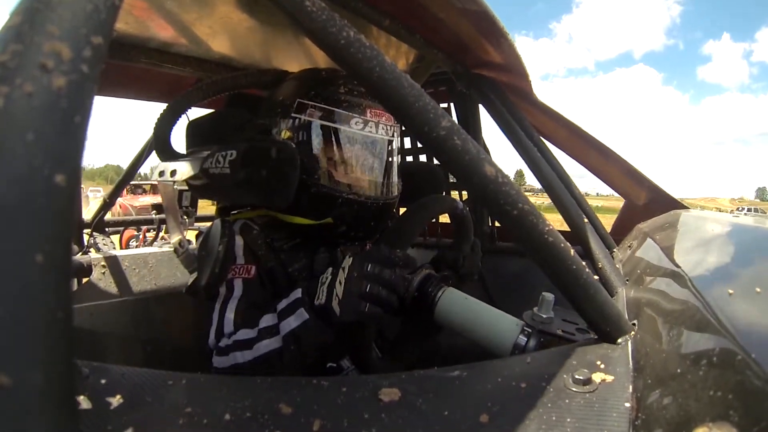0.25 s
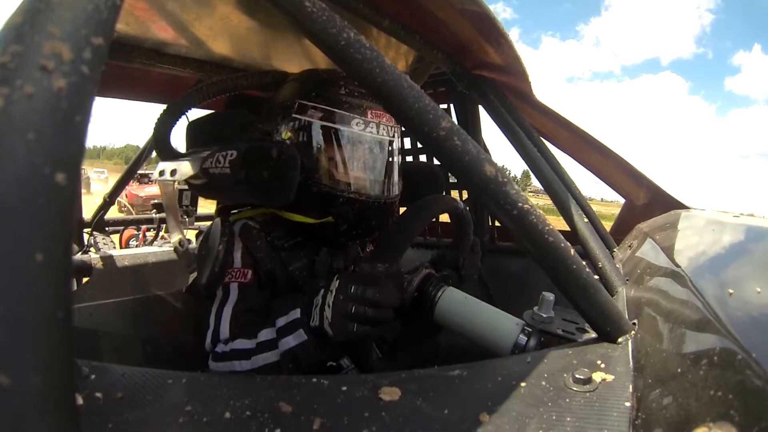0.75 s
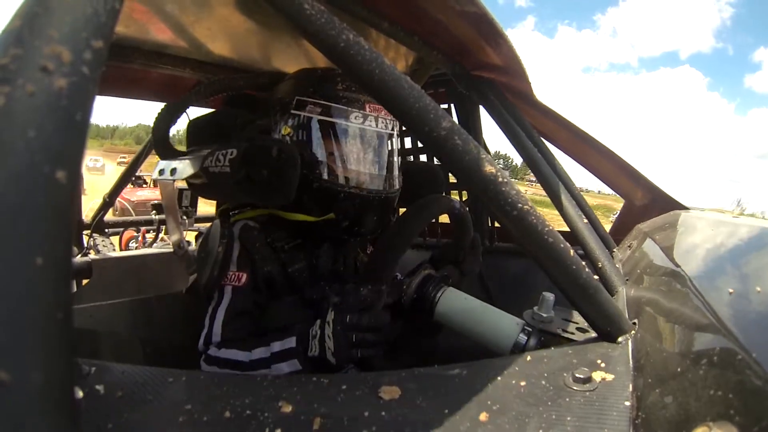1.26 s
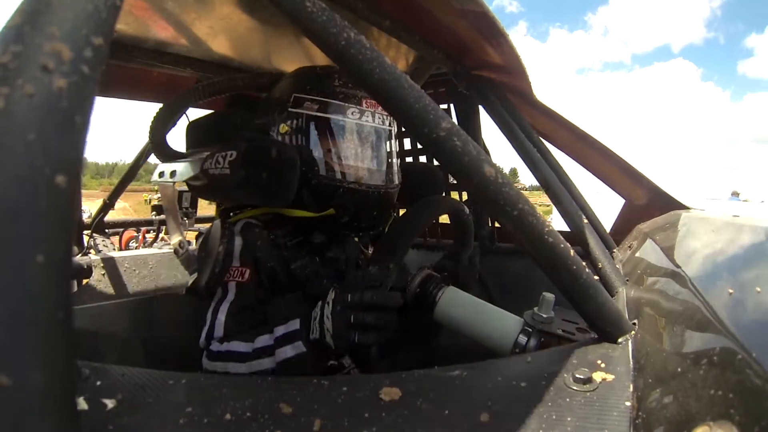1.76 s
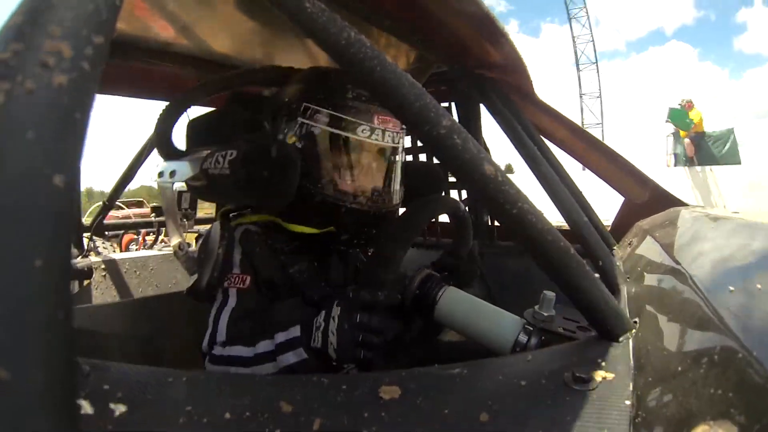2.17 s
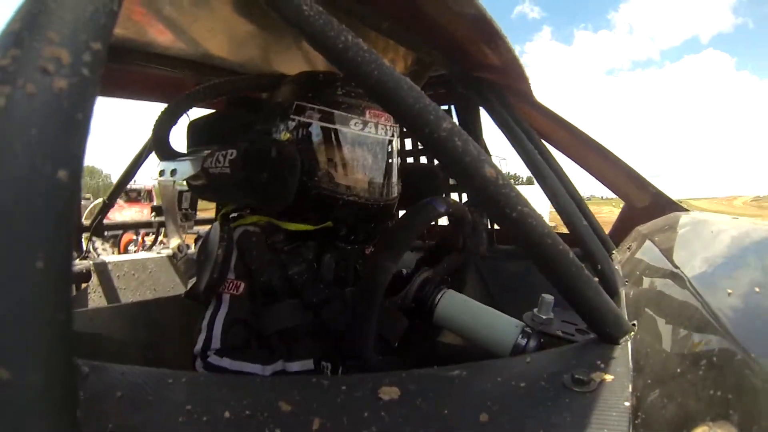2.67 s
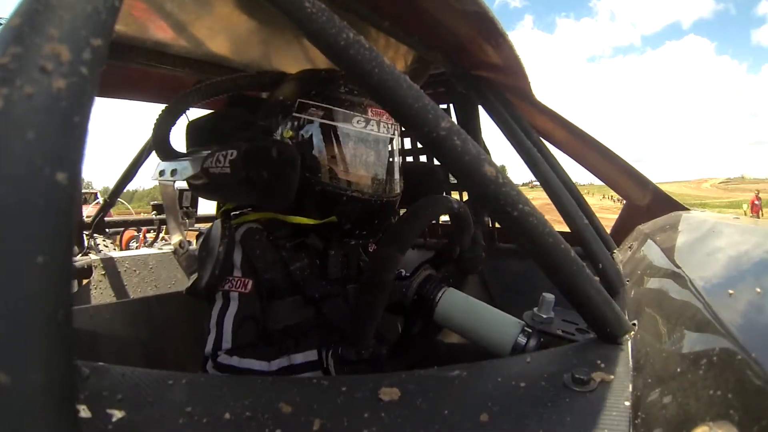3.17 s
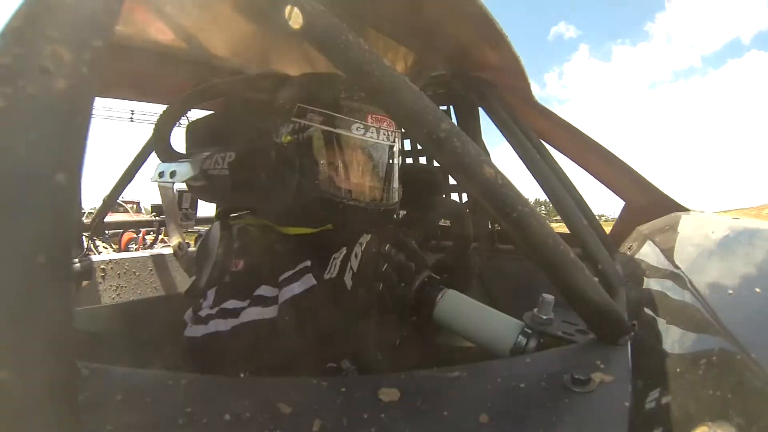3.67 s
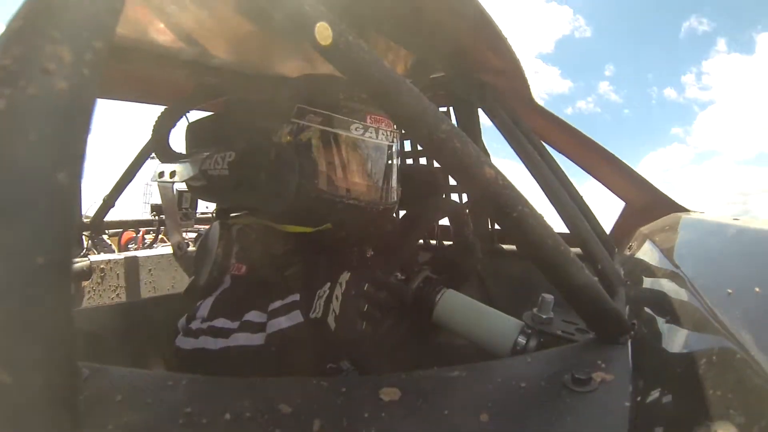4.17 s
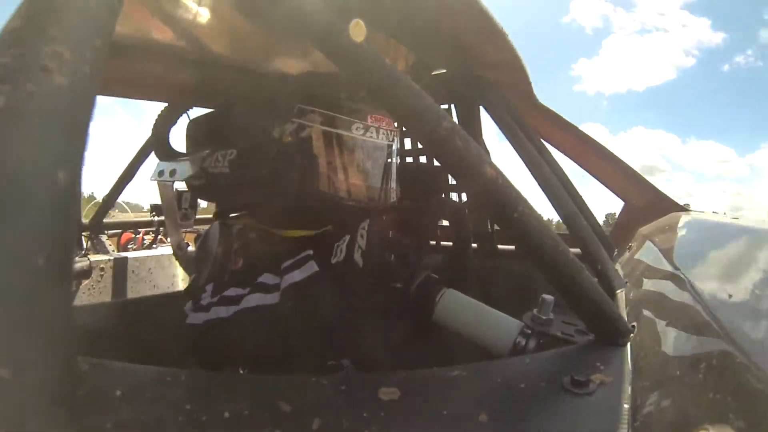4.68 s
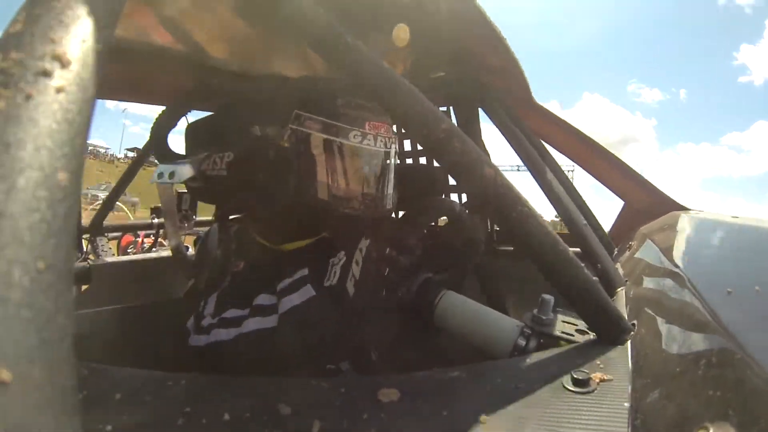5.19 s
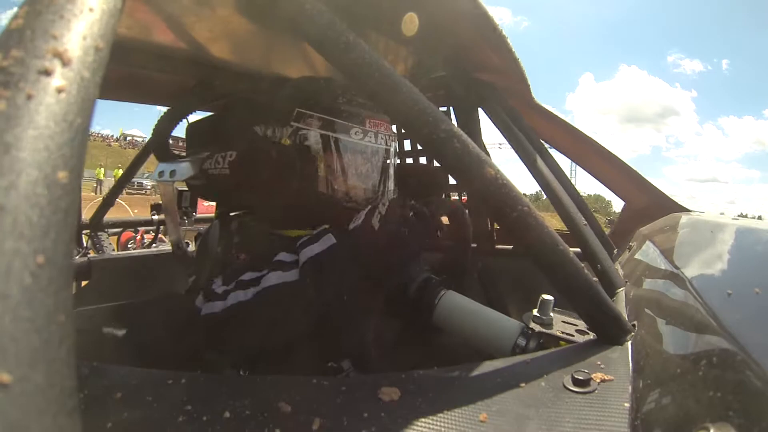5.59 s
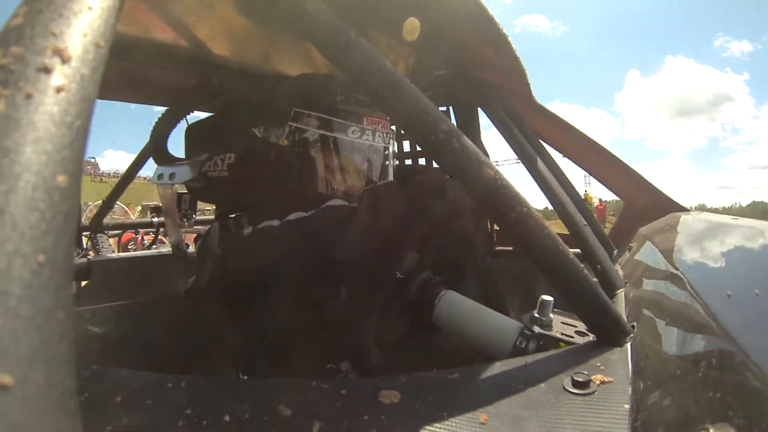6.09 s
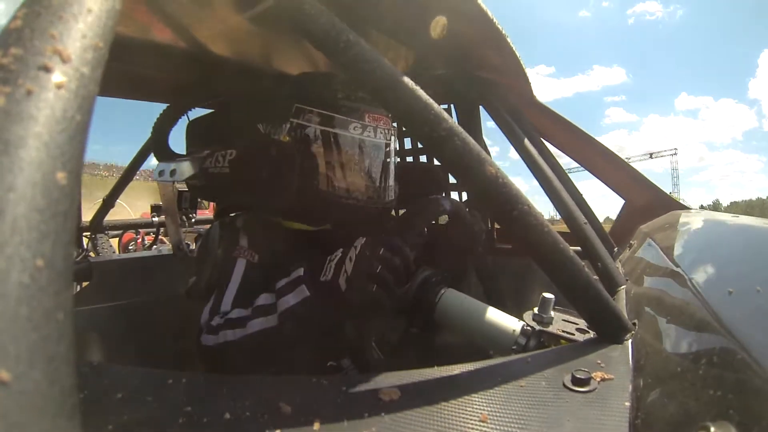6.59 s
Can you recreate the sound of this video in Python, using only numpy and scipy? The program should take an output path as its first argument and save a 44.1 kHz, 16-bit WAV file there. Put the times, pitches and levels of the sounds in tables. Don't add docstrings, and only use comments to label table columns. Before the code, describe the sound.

Inside an open dirt-racing cockpit, a microphone sealed in a shaking housing picks up a strong low engine hum with dry rattling and faint exhaust hiss. The pitch wavers near two seconds, drops and recovers, then sags lower around three and a half seconds under rough bumps and grit pings. It climbs back and holds steadier, with less rattle, to the end.

```python
import sys
import numpy as np
from scipy import signal
from scipy.fft import rfft, irfft, next_fast_len
from scipy.io import wavfile
from scipy.ndimage import map_coordinates

SR = 44100
rng = np.random.default_rng(int(sys.argv[2]) if len(sys.argv) > 2 else 0)


def store_pcm(level_fs):
    pcm = np.round(np.clip(level_fs, -1, 1) * 32767).astype(np.int16)
    wavfile.write(sys.argv[1], SR, np.atleast_2d(pcm).T)


def how_loud(loudness_db):
    steps = np.asarray(loudness_db, float) / 20
    return 10 ** steps


N = 301644
USUAL_ROAD_DB, USUAL_PEDAL_DB = -27, -60

# (time [s], housing rattle [dB])
ROAD = [(0, -26), (.95, -26.5), (1.62, -27.5), (1.76, -23), (1.96, -22.5), (2.0, -26.5), (2.11, -34),
        (2.34, -21), (2.65, -35.5), (3.05, -33), (3.22, -21), (3.73, -16), (3.92, -18), (4.44, -37),
        (4.95, -32), (5.6, -39.5), (6.1, -29.5), (6.84, -32)]
# (time [s], rise [dB], half length [s])
PATCHES = [(.02, 1.5, 0.11), (.91, 2, 0.053), (1.08, 0, 0.06), (1.96, 1.5, 0.022), (2.42, 2.5, 0.067),
           (2.8, 2, 0.2), (3.33, 1, 0.049), (3.47, 0, 0.19), (4.72, 3, .08), (4.8, -2.5, .05),
           (5.0, 4.5, .08), (5.14, 2.5, .07), (5.52, 6.5, 0.2), (6.27, -4, 0.19), (6.52, 0.5, 0.17),
           (6.73, -1, 0.064)]
# (time [s], depth [dB], half length [s])
JOLTS = [(.17, 1, 0.069), (1.05, 1.5, .05), (1.88, 2, 0.11), (2.19, 10, 0.028), (2.25, 13, 0.025),
         (2.3, 9, 0.025), (3.11, 8, .08), (3.62, 2.5, 0.062), (3.82, 2, 0.014), (3.92, 17, 0.022),
         (4.0, 0, 0.027), (4.08, 15, 0.013), (4.68, 3, 0.088), (5.06, 3.5, 0.079), (5.49, 10.5, 0.057),
         (5.98, 1.5, 0.11)]
# (time [s], level [dB])
BUMPS = [(0, -33), (.13, -30), (.3, -29), (.6, -29), (.82, -30), (1.03, -28), (1.25, -32), (1.43, -30),
         (1.66, -30), (2.23, -34), (2.38, -24), (2.93, -35), (3.37, -18.5), (3.54, -17.5), (3.79, -16.5),
         (3.94, -15), (4.2, -24), (4.65, -27), (4.99, -21), (5.24, -28), (5.52, -27), (5.98, -25),
         (6.13, -25), (6.5, -32), (6.8, -32)]
# (time [s], crank turns a second [Hz])
SPEED = [(0, 109.5), (.25, 108), (.9, 108.5), (1.6, 106.5), (2.0, 105), (2.17, 96.72), (2.25, 85.6),
         (2.36, 93.9), (2.68, 102.6), (2.92, 104.9), (3.33, 81.75), (3.69, 74.95), (3.97, 74.4),
         (4.05, 87.4), (4.3, 99.3), (4.71, 104.4), (5.7, 102.3), (6.84, 107.1)]
# (time [s], rise [Hz], half length [s])
SURGES = [
    (1.85, 7.59, 0.1799),
    (5.08, 5.52, .17),
    (5.51, 7.15, .08),
    (6.1, 4.27, .3),
]
# (time [s], held [s], exhaust hiss [dB], sag [dB a second])
PEDAL = [
    (-.1, 1.71, -58.5, -0.6),
    (1.56, .39, -59.5, -11.5),
    (2.31, .5, -56.5, 21.5),
    (2.71, .23, -60, 7),
    (3.12, .96, -66, 0),
    (4.03, .7, -57.5, 14),
    (4.65, 0.66, -63.5, -3.5),
    (5.09, .45, -61.5, 18),
    (5.48, 0.7, -60.5, 15.5),
    (5.91, 1.11, -62, -2.5),
]
# (time [s], crack peak [dB], ring peak [dB], ring pitch [Hz])
GRIT = [(1.3254, -49.5, -41.5, 4140), (1.8592, -39.5, -39, 4174), (1.934, -42, -43, 4696),
        (2.9212, -45, -50, 4285), (3.107, -46, -43, 4550), (3.115, -56, -46.5, 4700),
        (3.2196, -36.5, -38, 4573), (3.6677, -53, -17.5, 4540), (3.718, -46.5, -28, 4680),
        (4.4764, -48.5, -25.5, 4530), (5.5953, -53, -37.5, 3700)]
# (time [s], length [s], first pitch [Hz], last pitch [Hz], level [dB])
WHINE = [(0, 1.1, 1430, 1432, -38), (-.05, .55, 2835, 2862, -39), (.52, .55, 2848, 2862, -39),
         (-.05, .8, 3066, 3050, -44), (1.28, .5, 3222, 3070, -43), (.25, .9, 1036, 1024, -35),
         (1.0, .2, 930, 914, -27), (1.2, .42, 926, 906, -28), (1.15, .55, 1004, 952, -31),
         (2.2, .18, 938, 952, -25), (2.35, .4, 908, 948, -30.5), (2.66, .39, 954, 912, -30),
         (6.08, .26, 915, 886, -31), (6.28, .38, 892, 908, -29), (6.6, .26, 895, 878, -37)]
# (pitch [Hz], width [Hz], level [dB])
FRAME = [(98.2, 25, 8), (227.4, 23, 1.5), (267, 30, -1.5), (375.3, 57, -8.5), (464.8, 49, -4),
         (639, 25, -16.5)]
# (pitch [Hz], width [Hz], level [dB])
TUBES = [(224.5, 22.3, -0.5), (270.2, 25.5, -3)]
# (pitch [Hz], width [Hz], level [dB])
SHELL_LOW = [(700.7, 12, -4), (832, 73, 1), (908, 79, 5), (1117, 80, 8), (1263, 180, -4.5), (1395, 75, 4.5),
             (1560, 185, -1), (1724, 61, 3.5), (2062, 140, 0), (2420, 200, -11.5)]
# (pitch [Hz], width [Hz], level [dB])
SHELL_HIGH = [(2632, 300, -12), (2900, 120, -0.5), (3129, 148, -3.5), (4260, 516, -17), (4680, 170, -13),
              (5287, 220, -16.5)]
# (pitch [Hz], width [Hz], level [dB])
LATCH = [(1119, 37, 0.5), (4650, 150, -24)]
# (pitch [Hz], width [Hz], level [dB])
VALVE_COVER = [(7440, 160, 0)]
# (frequency [Hz], level per Hz [dB])
RUMBLE = [(15, 2), (30, -14.5), (70, -3), (150, -23.5), (400, -31), (800, -15.5), (2000, -19), (4000, -47),
          (9000, -110)]
# (frequency [Hz], level per Hz [dB])
AIR_RUSH = [(3000, -30), (5000, -2), (7000, 0.5), (9000, -15), (12000, -14), (14300, -27), (15500, -29)]
# (frequency [Hz], level per Hz [dB])
EXHAUST = [(2500, -40.5), (4500, -4.5), (6000, -1), (7500, -2.5), (8800, -3), (11000, -9.5), (13000, -11),
           (14300, -21), (15500, -26.5)]
# (multiple of crank speed [1], level against the second multiple [dB])
ORDERS = [(.5, -8.5), (2.5, -11), (3, -5), (1.5, -7.5), (3.5, -10)]


def ticks():
    return np.arange(0, N + 64, 64) / SR


def smooth(control):
    return np.interp(np.arange(N) / SR, ticks(), control)


def curve(rows):
    s, value = np.transpose(rows)
    return np.interp(np.arange(N) / SR, s, value)


def humps(rows):
    total = 0
    for s, height, half in rows:
        position = np.clip((ticks() - s) / half, -1, 1)
        total = total + height * np.cos(np.pi / 2 * position) ** 2
    return smooth(total)


def wobble(rate):
    knots = rng.standard_normal(int(N * rate / SR) + 4)
    return smooth(map_coordinates(knots, [ticks() * rate]))


def unit(x):
    return x / np.sqrt(np.mean(x ** 2) + 1e-20)


def noise():
    return rng.standard_normal(N)


def filtered(x, response):
    m = next_fast_len(N + SR // 2)
    spectrum = rfft(x, m) * response(np.fft.rfftfreq(m, 1 / SR))
    return unit(irfft(spectrum, m)[:N])


def colour(points):
    f, db = np.transpose(points)
    return lambda hz: how_loud(np.interp(np.log(hz + 1), np.log(f + 1), db))


def modes(table, steep=1):
    def response(f):
        total = 0
        for k, (centre, width, db) in enumerate(table):
            damping = 1j * f * width
            ring = damping / (centre * centre - f * f + damping)
            total = total + (-1) ** k * how_loud(db / steep) * ring
        return total ** steep
    return response


def walls(edge_hz, order):
    return lambda f: 1 / (1 + 1j * f / edge_hz) ** order


def knocks(per_second, spread_db):
    hit = rng.random(N) < per_second / SR
    strength = how_loud(spread_db * rng.exponential(size=N))
    return unit(hit * strength * noise())


def road():
    return curve(ROAD) + humps(PATCHES) + 0.14 * humps(JOLTS) - USUAL_ROAD_DB


def pedal():
    t = ticks()
    shut_db, move_s = -69, 0.068
    presses = []
    for s, held, db, sag in PEDAL:
        opening = np.clip(np.minimum(t - s, s + held - t) / move_s + 0.5, 0, 1)
        presses.append(opening * (db - sag * (t - s) - shut_db))
    return smooth(shut_db + np.max(presses, axis=0) - USUAL_PEDAL_DB)


def speed():
    return curve(SPEED) + humps(SURGES)


def crank_turns():
    shiver = 1 + 0.0036 * wobble(19) + 0.00495 * wobble(5)
    return np.cumsum(speed() * shiver) / SR


def grit():
    out, t = np.zeros(N + SR), np.arange(600) / SR
    for s, crack_db, ring_db, hz in GRIT:
        rough = np.convolve(rng.standard_normal(len(t)), [1, 1, -1, -1], 'same')
        crack = rough * how_loud(crack_db - 8 - 60 * t / 0.006)
        ring = how_loud(ring_db - 5 - 60 * t / 0.011) * np.sin(2 * np.pi * hz * t)
        out[round(s * SR):][:len(t)] += crack + ring
    return out[:N]


def whine():
    t, out = ticks(), np.zeros(N)
    for s, length, first_hz, last_hz, db in WHINE:
        hz = smooth(first_hz + (last_hz - first_hz) * np.clip((t - s) / length, 0, 1))
        fade = smooth(np.clip(np.minimum(t - s, s + length - t) / 0.064, 0, 1))
        flutter_db = 2.2 * wobble(20)
        drift_hz = hz / 200 * wobble(18)
        out += fade * how_loud(db + flutter_db) * np.sin(2 * np.pi * np.cumsum(hz + drift_hz) / SR)
    return out


def arm_sway():
    t = ticks()
    rise, fall = 107.5, 56
    swings = [db - np.maximum(rise * (s - t), fall * (t - s)) for s, db in BUMPS]
    level_db = smooth(np.max(swings, axis=0)) + 3 + 0.8 * wobble(11)
    hz = 32.2 + 0.8 * wobble(5.1)
    return how_loud(level_db) * np.sin(2 * np.pi * np.cumsum(hz) / SR)


def chassis():
    frame_db = -37.5 + 0.43 * road() + 1.6 * wobble(9)
    tube_modes, shell = modes(FRAME, steep=1.5), walls(1200, order=2)
    ring = filtered(knocks(2000, spread_db=0.06), lambda f: tube_modes(f) * shell(f))
    tubes = how_loud(1.5 * (frame_db + 39) - 35) * ring
    rumble = how_loud(-28.5 + 0.96 * (frame_db + 38)) * filtered(noise(), colour(RUMBLE))
    return arm_sway() + tubes + rumble


def rattle(turns):
    rough_db = road() + 0.46 * wobble(8.1)
    shared = how_loud(0.93 * wobble(16) + 0.9 * wobble(45))

    def chatter(lag):
        beat_db = 1.56 * np.cos(2 * np.pi * turns + lag) + 0.37 * np.cos(np.pi * turns)
        return shared * how_loud(beat_db) * (noise() + 0.49 * knocks(700, spread_db=1.5))

    def low_shell(f):
        hollow = 1 - 0.85 * modes([(1315, 90, 0)])(f)
        return modes(SHELL_LOW)(f) * hollow * walls(3500, order=3)(f)

    def high_shell(f):
        return modes(SHELL_HIGH, steep=1.4)(f) * walls(6500, order=3)(f)

    low = how_loud(USUAL_ROAD_DB + rough_db) * filtered(chatter(0.2), low_shell)
    high_db = -36.5 + 0.65 * rough_db + 0.4 * pedal()
    high = how_loud(high_db) * filtered(chatter(0.99), high_shell)
    latch = how_loud(-41.5 + 1.44 * rough_db) * filtered(chatter(0.44), modes(LATCH))
    return low + high + latch


def air_rush():
    return how_loud(-66.5 + 0.3 * (road() + 4)) * filtered(noise(), colour(AIR_RUSH))


def valve_taps(turns):
    taps = how_loud(-14 * (turns % 1)) * noise()
    level_db = -68 + 0.44 * road() + 0.49 * pedal()
    return how_loud(level_db) * filtered(taps, modes(VALVE_COVER, steep=2.3))


def exhaust(turns):
    hiss_db = USUAL_PEDAL_DB + pedal() + 0.9 * wobble(14)
    cycle = turns / 2 + 0.28
    size_db = 1.4 * rng.standard_normal(int(cycle[-1]) + 2)[cycle.astype(int)]
    gate = how_loud(size_db - 14.6 * np.maximum(cycle % 1 - 0.2, 0))
    return how_loud(-59.5 + 1.08 * (hiss_db + 63.5)) * filtered(gate * noise(), colour(EXHAUST))


def hum(turns):
    hz = speed()
    mount_hz, fade_db_per_hz = 94.7, 0.45
    slow_db = fade_db_per_hz * np.maximum(mount_hz - hz, 0)
    hum_db = -14 - slow_db - humps(JOLTS) + 0.21 * wobble(6)
    main = how_loud(hum_db + 0.85 * wobble(17)) * np.sin(2 * np.pi * turns)
    shake = how_loud(-33 + 0.3 * road())

    def through_tubes(k):
        return shake * (0.15 + np.abs(modes(TUBES)(k * hz)))

    second_db = 1.8 * wobble(22) + 1.9 * wobble(5)
    second = through_tubes(1.999) * how_loud(second_db) * np.sin(4 * np.pi * turns + 1.5)
    rest = np.zeros(N)
    for k, db in ORDERS:
        rest += through_tubes(k) * how_loud(db + 3.8 * wobble(14)) * np.sin(2 * np.pi * k * turns + k)
    return np.sqrt(2) * (main + second + rest)


def scene():
    turns = crank_turns()
    surroundings = grit() + whine() + chassis() + rattle(turns) + air_rush()
    engine = valve_taps(turns) + exhaust(turns) + hum(turns)
    return (surroundings + engine)[None]


def band_limit(x):
    return signal.sosfilt(signal.butter(12, 15009, fs=SR, output="sos"), x)


def record(dry):
    rounded = dry / (1 + np.abs(dry / 0.92) ** 5) ** (1 / 5)
    return band_limit(rounded)


dry = scene()
out = record(dry)
store_pcm(out)
```